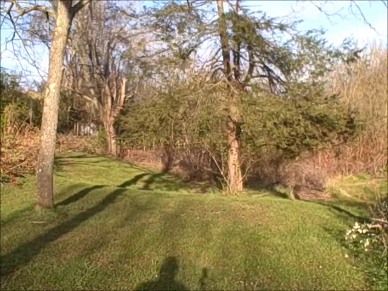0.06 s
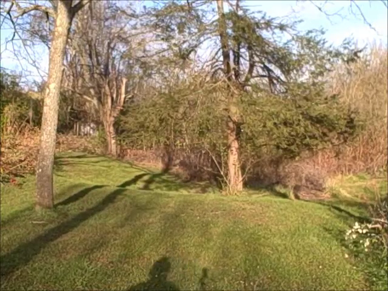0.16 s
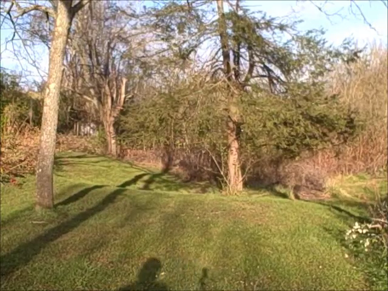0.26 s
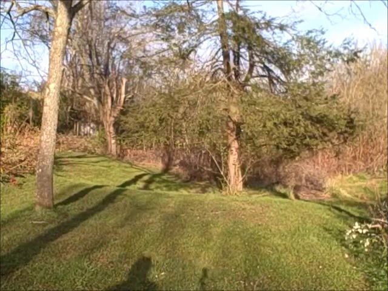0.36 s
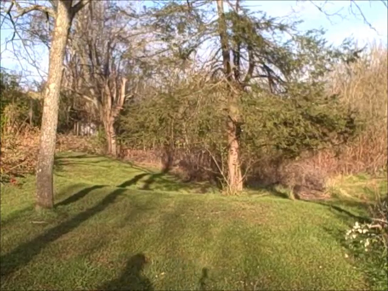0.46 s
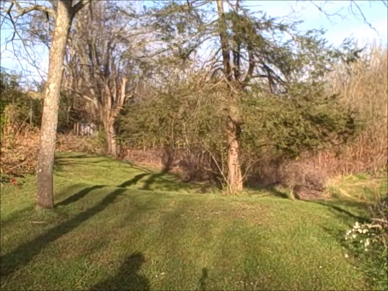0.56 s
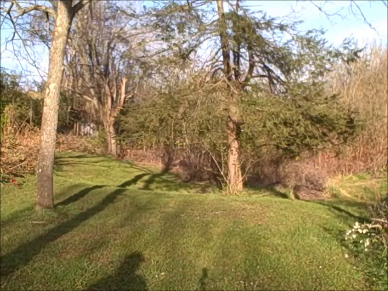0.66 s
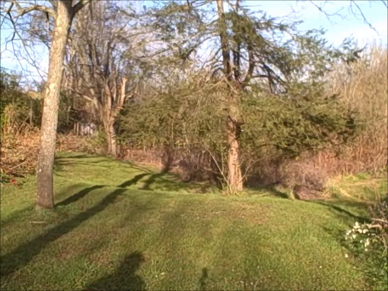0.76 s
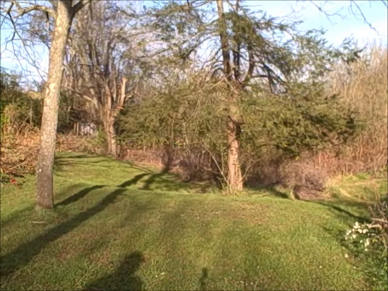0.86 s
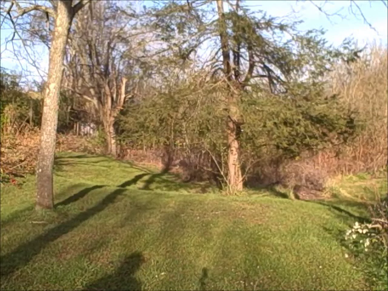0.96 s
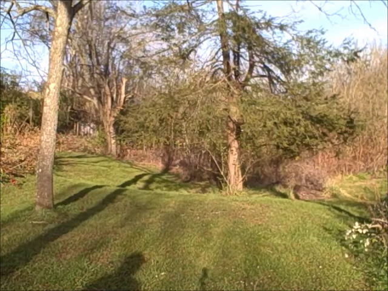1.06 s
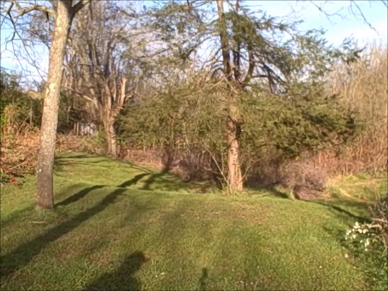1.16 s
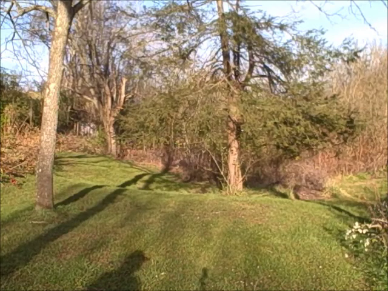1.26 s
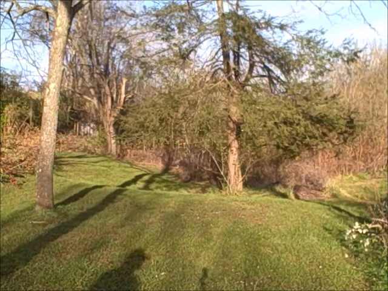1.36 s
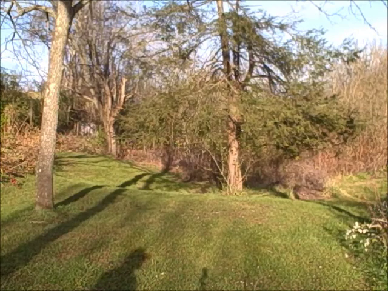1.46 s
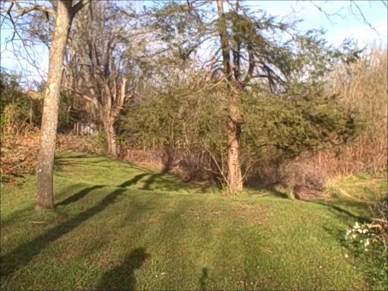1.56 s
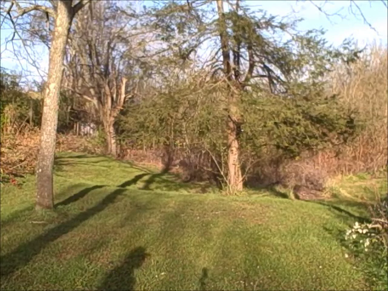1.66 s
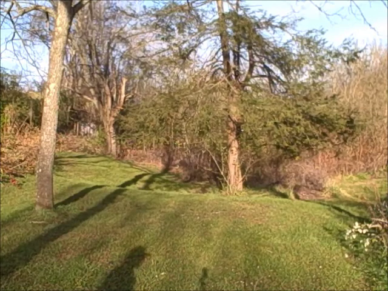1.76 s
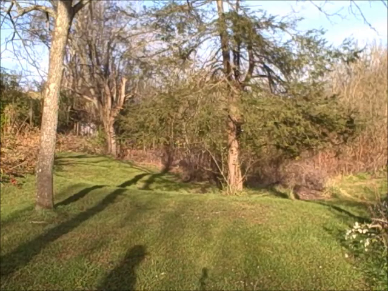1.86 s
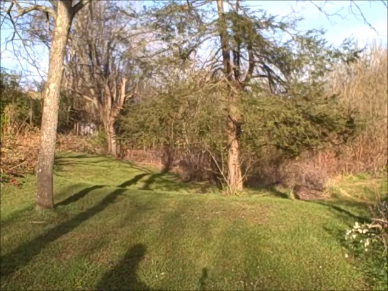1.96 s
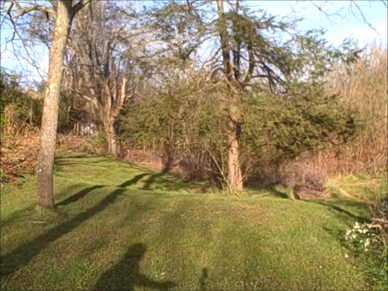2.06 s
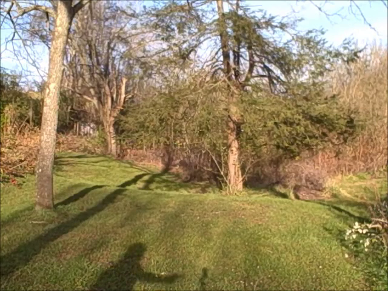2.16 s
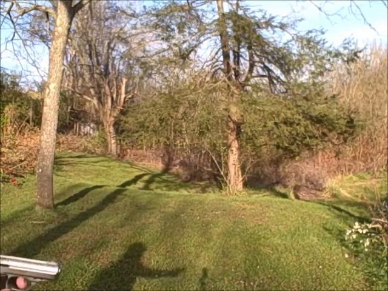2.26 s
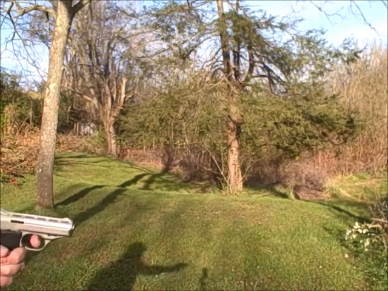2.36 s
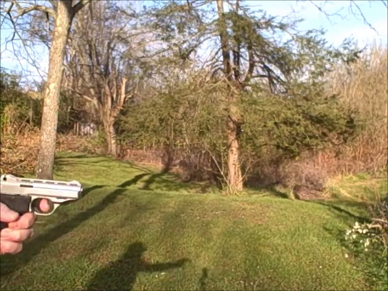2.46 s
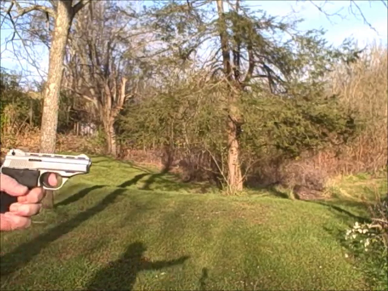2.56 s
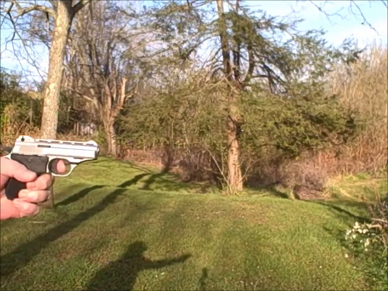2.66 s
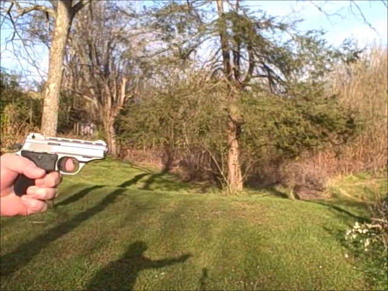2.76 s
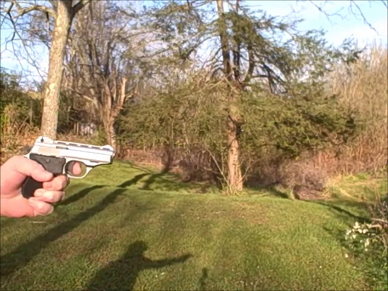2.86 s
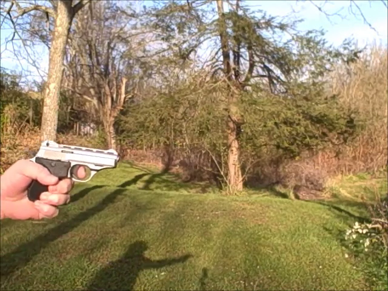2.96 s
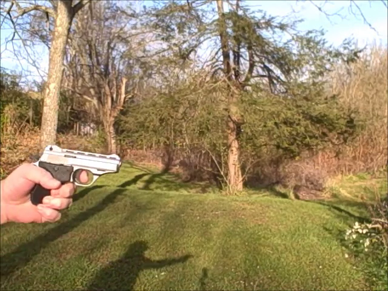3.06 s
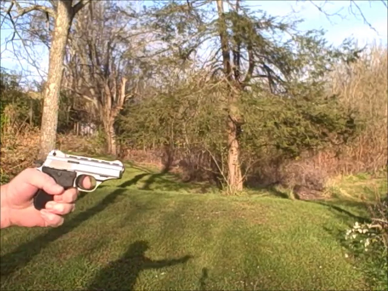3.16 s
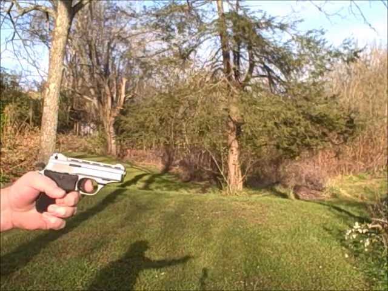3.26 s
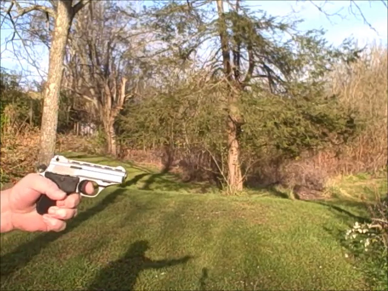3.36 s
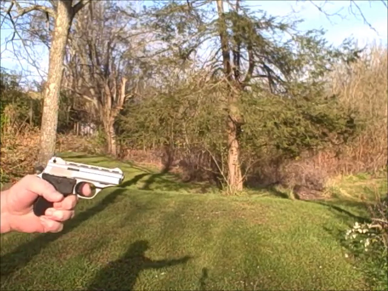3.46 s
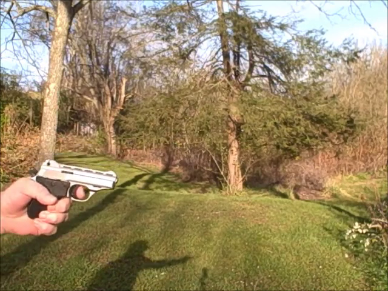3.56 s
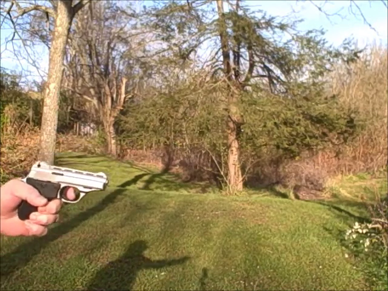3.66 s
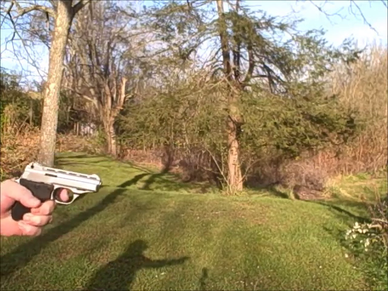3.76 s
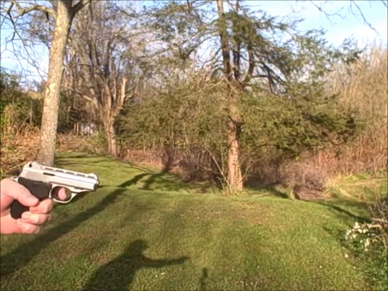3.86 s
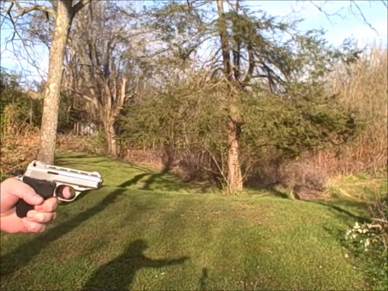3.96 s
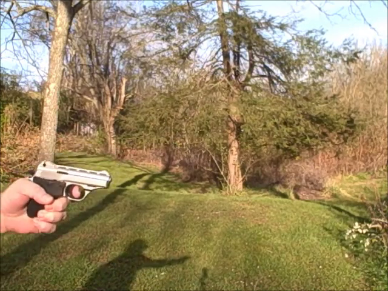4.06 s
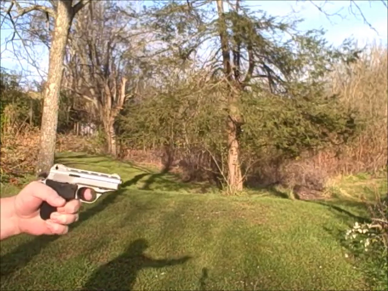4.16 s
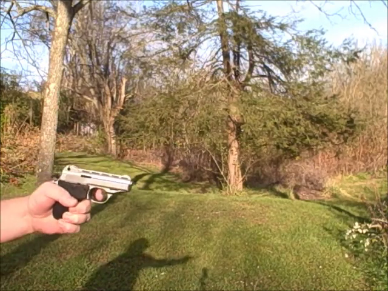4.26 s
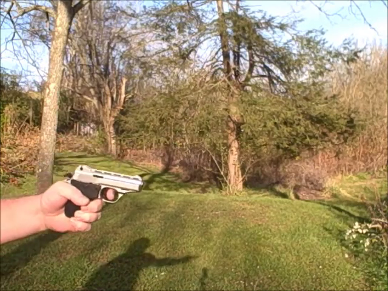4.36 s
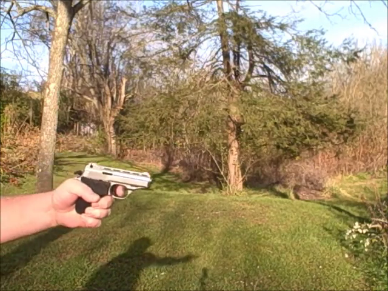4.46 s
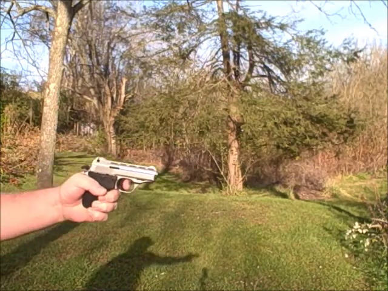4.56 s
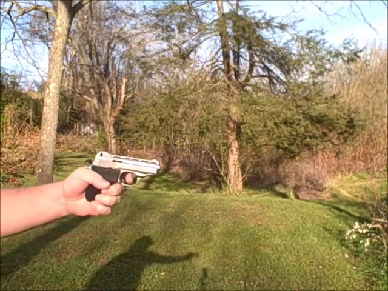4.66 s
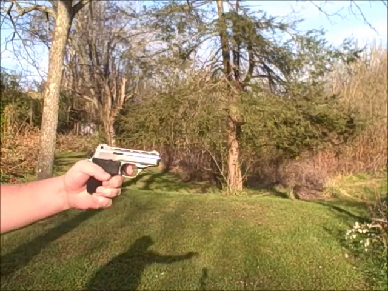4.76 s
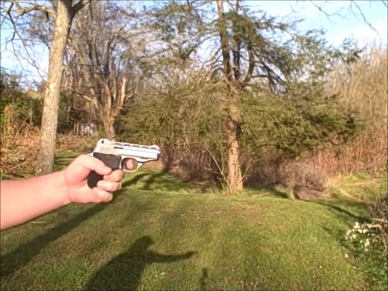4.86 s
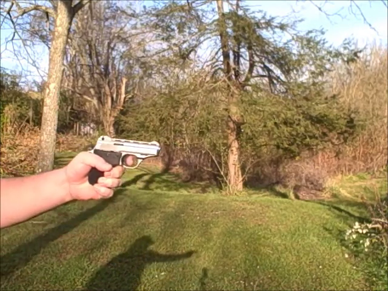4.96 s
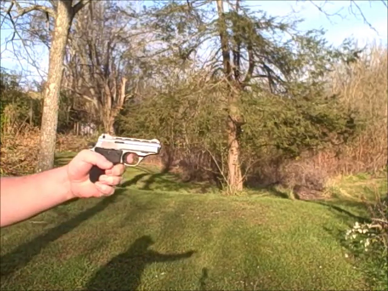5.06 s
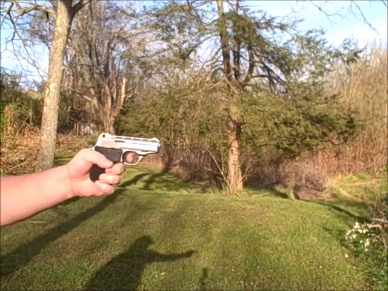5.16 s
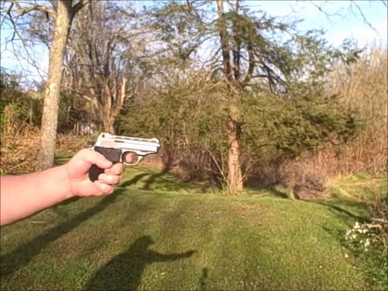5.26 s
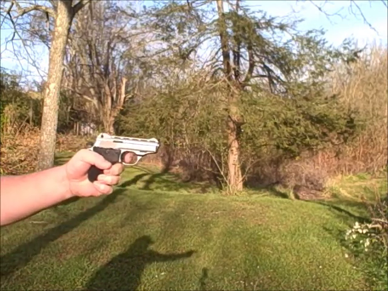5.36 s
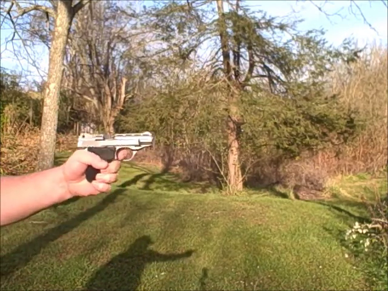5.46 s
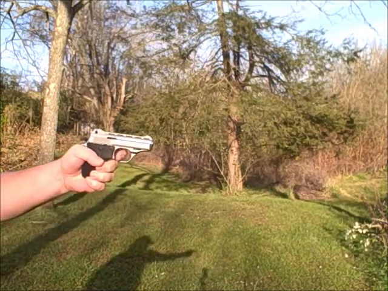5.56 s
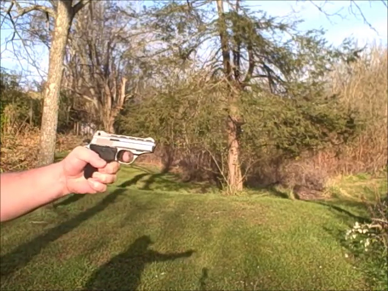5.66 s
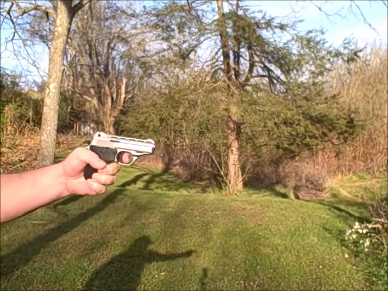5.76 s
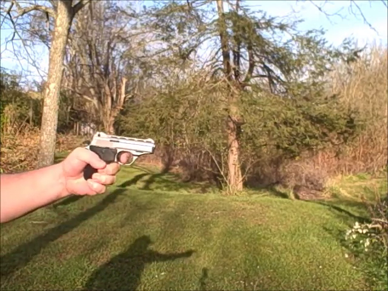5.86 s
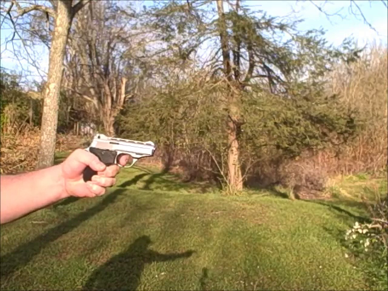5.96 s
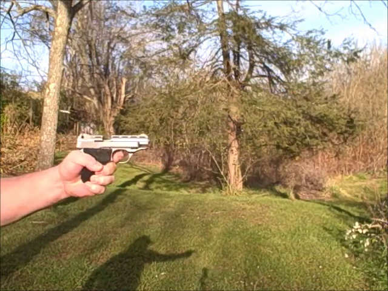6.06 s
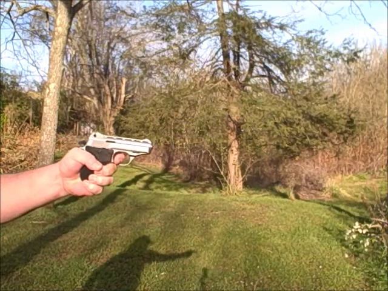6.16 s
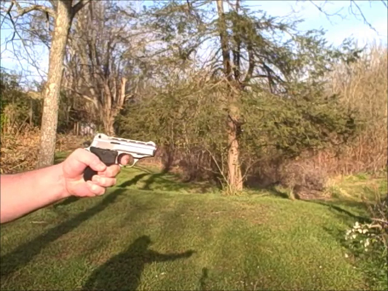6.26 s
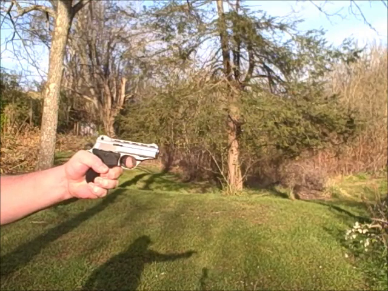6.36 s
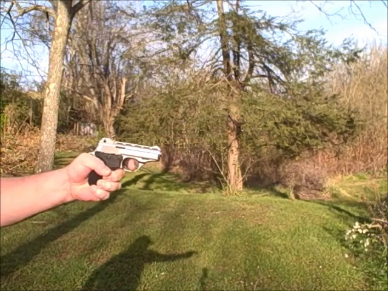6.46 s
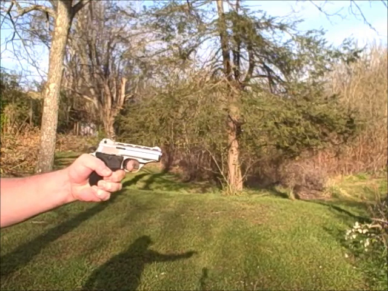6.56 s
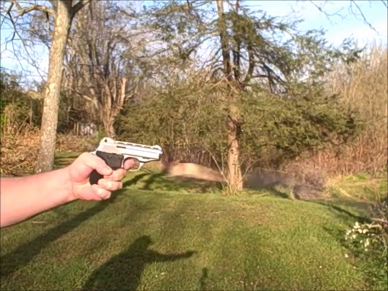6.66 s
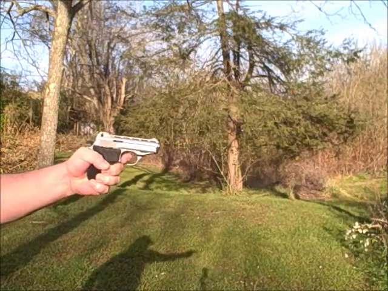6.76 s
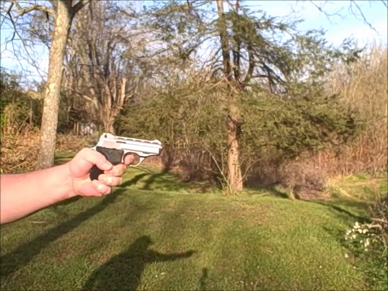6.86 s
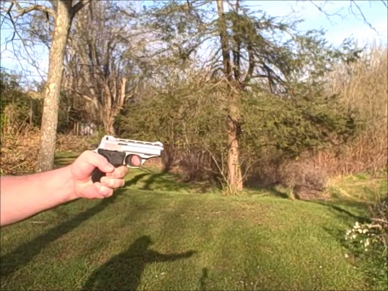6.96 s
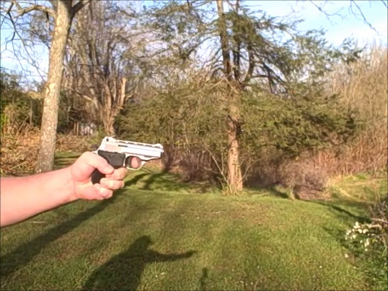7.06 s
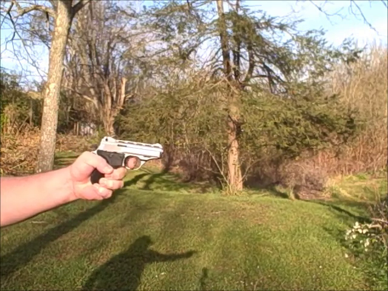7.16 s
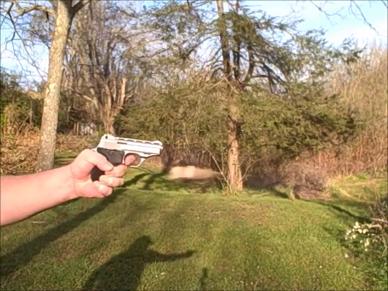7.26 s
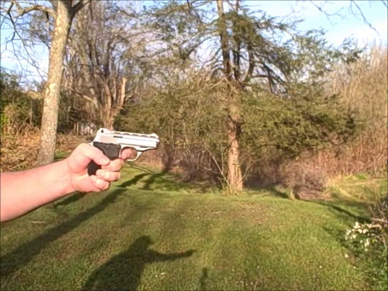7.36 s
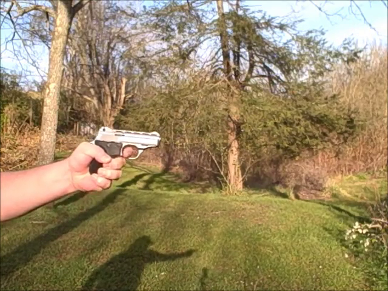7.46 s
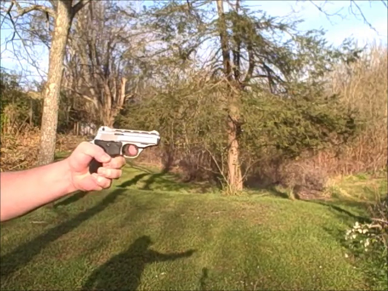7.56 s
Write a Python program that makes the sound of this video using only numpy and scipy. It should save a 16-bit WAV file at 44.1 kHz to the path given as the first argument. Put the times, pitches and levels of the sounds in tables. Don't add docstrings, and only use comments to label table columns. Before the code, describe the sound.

Sleeve rustling, clicks and faint wind outdoors, then a small handgun fires four evenly spaced, overloaded cracks, each trailing briefly into the trees.

```python
import sys
import numpy as np
from scipy import signal
from scipy.io import wavfile

SR = 44100
rng = np.random.default_rng(int(sys.argv[2]) if len(sys.argv) > 2 else 0)


def materialize(psi):
    bounded = np.clip(np.atleast_2d(psi).T, -1, 1)
    quanta = np.round(bounded * 32767).astype(np.int16)
    wavfile.write(sys.argv[1], SR, quanta)


def ratio_of_db(decibels):
    return 10 ** (np.asarray(decibels, float) / 20)


N = 335160

# t/s, recovery/ms, rebound height, rebound swing f/Hz, rebound decay/s
SHOTS = [
    (5.567, 7.7, 0.42, 3.1, 0.11),
    (6.1617, 5.4, 0.13, 0.72, 0.26),
    (6.7910, 4.8, 0.13, 0.68, 0.23),
    (7.3915, 4.8, 0.16, 0.64, 0.19),
]
SETTLED_DB = -15


def rms_one(x):
    return x / np.sqrt(np.mean(x ** 2) + 1e-20)


def in_time(rows, start=0):
    s, *columns = np.transpose(rows)
    return [np.interp(np.arange(N) / SR + start, s, c) for c in columns]


def at_hz(points, hz, column=1):
    table = np.array(points)
    return np.interp(np.log(hz), np.log(table[:, 0]), table[:, column])


def band(x, low_hz, high_hz):
    return signal.sosfilt(signal.butter(2, [low_hz, min(high_hz, .45 * SR)], "band", fs=SR, output="sos"), x)


def drift(rate_hz):
    r = np.exp(-2 * np.pi * rate_hz / SR)
    white = rng.standard_normal(N + SR)
    return rms_one(signal.lfilter([1], [1, -2 * r, r * r], white)[SR:])


def coloured(spectrum, fading, patchy_db, size=N):
    out, power, white = 0, 0, rng.standard_normal((2, size))
    octaves = np.log2(spectrum[-1][0] / spectrum[0][0])
    edges = spectrum[0][0] * 2 ** np.arange(0, octaves + .3, 1 / 3)
    flicker = drift(25.0)
    for k, (low, high) in enumerate(zip(edges, edges[1:])):
        hz = np.sqrt(low * high)
        part = ratio_of_db(at_hz(spectrum, hz)) * band(white[k % 2], low, high)
        power += np.mean(part ** 2)
        flicker_db = patchy_db * np.roll(flicker, 9973 * k)[:size]
        out = out + part * ratio_of_db(flicker_db - at_hz(fading, hz) * np.arange(size) / SR)
    return out / np.sqrt(power)


def add(out, s, piece):
    i = round(s * SR)
    out[i:i + len(piece)] += piece[:len(out) - i]


def ping(hz, t60):
    t = np.arange(int(t60 * SR)) / SR
    return np.sin(2 * np.pi * hz * t) * ratio_of_db(-60 * t / t60)


def burst(low_hz, high_hz, t60):
    t = np.arange(2000) / SR
    return rms_one(band(rng.standard_normal(2000), low_hz, high_hz)) * ratio_of_db(-60 * t / t60)


def swell(s, rise_s, fall_s, curve):
    shape = np.interp(np.arange(N) / SR, [s - rise_s, s, s + fall_s], [0, 1, 0])
    return np.power(shape, curve, out=np.zeros(N), where=shape > 0)


def background():
    # t/s, f/Hz, level/dB
    engine = [(0.0, 53.9, -50.5), (1.06, 58.1, -51.5), (1.25, 63.07, -59), (1.45, 56.2, -65),
              (1.93, 54, -51.5), (2.65, 51.36, -50), (4.79, 45.87, -46.5), (4.95, 55.7, -54),
              (5.1, 61.9, -51), (5.5, 80, -61)]
    # t/s, level/dB
    breeze = [(0, -66), (1.7, -67.5), (2.3, -52), (3.0, -78), (3.7, -59), (4.12, -49.5), (4.5, -53),
              (4.84, -58), (5.42, -51), (5.54, -48)]
    # t/s, level/dB, width/s
    gust_rows = [(.26, -53, .08), (.6, -53.5, 0.3), (1.28, -43, 0.15), (1.48, -46, 0.084),
                 (1.96, -45, 0.18), (2.48, -41, .1), (4.58, -35.5, .09)]
    # f/Hz, level/dB per Hz
    air_colour = [(24, -23), (45, -11), (70, -14), (131, -22), (900, -28.5), (2000, -32.5), (3050, -40),
                  (16500, -50)]
    air_db = -51.5
    hz, engine_db = in_time(engine)
    engine_level = np.sqrt(2) * ratio_of_db(engine_db + 1.3 * drift(6.3))
    unsteady_hz = hz * (1 + 0.0096 * drift(6))
    drone = engine_level * np.sin(2 * np.pi * np.cumsum(unsteady_hz) / SR)
    gusts = sum(ratio_of_db(db) * swell(s, width, 1.26 * width, 1.5) for s, db, width in gust_rows)
    wind_level = ratio_of_db(in_time(breeze)[0] + 3.0 * drift(5)) + gusts
    wind = wind_level * rms_one(band(rng.standard_normal(N), 10, 30))
    air = ratio_of_db(air_db) * coloured(air_colour, [(1000, 0.0042), (2000, 0.0072)], patchy_db=2.1)
    return drone + wind + air


def rustle():
    # peak t/s, rise/s, fall/s, fabric hiss level/dB, dull rubbing level/dB
    moves = [(.28, 0.062, 0.019, -41, -45), (.3, 0.035, 0.88, -51.5, -54.5),
             (.55, 0.03, 0.12, -39.5, -42.5), (.7, 0.16, .2, -54, -58), (1.13, 0.47, 0.09, -47.5, -48.5),
             (1.23, 0.083, 0.68, -49.5, -52), (1.48, .08, 0.26, -56, -78), (1.76, 0.075, 0.18, -43, -51),
             (1.87, 0.12, .06, -74, -50.5), (2.17, 0.38, 0.13, -49.5, -43.5), (2.31, 0.061, 0.12, -52, -55),
             (2.42, 0.35, 0.2, -45, -46.5), (2.71, 0.14, 0.42, -61, -75), (3.44, 0.096, 0.57, -43, -51),
             (3.63, .1, 0.34, -44, -54.5), (3.93, 0.19, 0.48, -52, -54), (4.099, 0.029, 0.11, -36, -50),
             (4.24, 0.098, 0.099, -46, -59), (4.33, 0.16, 0.13, -54, -57), (4.4, .03, .04, -53, -61),
             (4.62, 0.5, 0.6, -55.5, -57), (4.81, 0.089, 0.077, -35.5, -42.5), (5.0, 0.19, .3, -65, -60),
             (5.18, .02, 0.071, -74, -64)]
    # f/Hz, level/dB per Hz
    fabric = [(2940, -43), (5000, -22), (8000, -9.5), (9960, -8.5), (13200, 0), (15700, -6), (16200, -12),
              (16500, -28.5)]
    swells = np.array([swell(s, rise, fall, 1.91) for s, rise, fall, *levels in moves])
    hiss_db, dull_db = np.transpose(moves)[-2:]
    scratch_db = -3 + 0.51 * hiss_db + 0.49 * dull_db
    before_shots = np.arange(N) < SHOTS[0][0] * SR

    grain_here = rng.random(N) < 450 * ratio_of_db(5 * drift(25)) / SR
    grain_height = ratio_of_db(6.4 * np.minimum(rng.exponential(1, N), 3.5))
    grains = rms_one(grain_here * grain_height * rng.choice([-1, 1], N))
    smooth = coloured(fabric, [(1000, 0), (2000, 0.012)], patchy_db=2.0) * ratio_of_db(1.5 * drift(40))
    hiss = smooth + 0.68 * rms_one(band(grains, 8200, 16000))
    slide = rng.standard_normal(N) + 0.74 * grains
    dull = rms_one(band(slide, 310, 1160)) * ratio_of_db(2.7 * drift(30))
    scratch = rms_one(band(slide, 2500, 6400))

    hiss_level = ratio_of_db(-78) + ratio_of_db(hiss_db) @ swells
    dull_level = ratio_of_db(-77) + ratio_of_db(dull_db) @ swells
    return before_shots * (hiss_level * hiss + dull_level * dull + ratio_of_db(scratch_db) @ swells * scratch)


def ticks_and_knocks():
    # t/s, peak level/dB
    seam_ticks = [(0.177, -35), (.3216, -27), (0.4177, -19), (0.4663, -23), (.633, -32), (.7013, -36),
                  (.7282, -35), (0.769, -23.5), (1.0705, -29), (1.1907, -34), (1.327, -27), (1.3586, -27),
                  (1.3897, -35), (1.507, -19.5), (1.5292, -21.5), (1.592, -27), (1.7484, -24.5),
                  (1.9202, -31), (3.813, -25), (3.8469, -26), (3.916, -38), (3.9719, -27), (4.1944, -27),
                  (4.221, -20), (4.2382, -18), (4.3897, -30), (4.3994, -31), (4.854, -22), (4.8973, -30),
                  (5.186, -29)]
    # t/s, peak level/dB, f/Hz
    grip_ticks = [(.2337, -37, 7310), (.2676, -30, 11000), (.3701, -31, 14300), (.5336, -33, 13010),
                  (1.1205, -30, 13800), (1.162, -22, 10300), (1.2395, -27, 13100), (1.4321, -36, 14400),
                  (1.4568, -29, 13200), (1.4815, -29.5, 8500), (2.1138, -24.5, 13500),
                  (2.2194, -33.5, 13870), (2.3207, -26.5, 13470), (3.733, -25, 12900),
                  (4.0903, -22.5, 11100), (4.338, -41, 12960), (4.499, -35, 11730), (4.7875, -26, 12970),
                  (4.98, -41, 13300), (5.1127, -35.5, 13200), (5.5643, -3, 9940)]
    # t/s, peak level/dB
    late_ticks = [(6.4894, -56), (6.5394, -58), (6.5744, -51), (6.6774, -57), (7.2694, -58)]
    # t/s, peak level/dB, f/Hz
    knocks = [(0.269, -36, 1130), (0.318, -31, 520), (0.59, -42, 360), (1.056, -31, 620),
              (1.124, -29.5, 680), (1.161, -43, 926), (1.2403, -41, 900), (1.456, -33.5, 820),
              (1.69, -42, 487), (1.817, -35, 770), (1.873, -26, 595), (2.121, -33, 869),
              (2.209, -36.5, 530), (2.351, -31, 640), (3.713, -36.5, 583), (3.734, -40, 586),
              (3.915, -37, 622), (4.128, -36.5, 525), (4.369, -37, 900), (4.655, -35, 785),
              (4.706, -37.5, 555), (5.035, -38.5, 584), (5.112, -36.5, 564), (5.567, 2, 480)]
    # peak t/s, rise/s, fall/s, f/Hz, level/dB
    slides = [(1.3, .1, .12, 4650, -62), (2.75, 0.22, .25, 5000, -66), (2.75, 0.22, .25, 6450, -70),
              (3.51, 0.017, 0.017, 2050, -58)]
    # t/s, f/Hz, level/dB, ring/s
    hollow = [(0.56, 195, -44, 0.22), (0.49, 376, -47, 0.1)]
    out = np.zeros(N)
    all_ticks = [(s, db, 13100, -23.5) for s, db in seam_ticks]
    all_ticks += [(*row, -12.5) for row in grip_ticks]
    for s, db, hz, body_db in all_ticks:
        bright = ratio_of_db(db - 2.5) * burst(0.55 * hz, 1.42 * hz, 0.0039)
        body = ratio_of_db(db + body_db + 5) * burst(800, 5500, 0.0055)
        add(out, s, bright + body)
    for s, db in late_ticks:
        add(out, s, ratio_of_db(db - SETTLED_DB - 5.0) * burst(9000, 15550, .012))
    for s, db, hz in knocks:
        add(out, s, ratio_of_db(db + 3.0) * ping(hz, 10.7 / hz))
        add(out, s, ratio_of_db(db - 6.5) * burst(700, 3600, 0.0053))
    for s, rise, fall, hz, db in slides:
        creak = rms_one(band(rng.standard_normal(N), 0.9 * hz, 1.04 * hz))
        out += ratio_of_db(db) * swell(s, rise, fall, 0.53) * creak
    for s, hz, db, ring_s in hollow:
        add(out, s, ratio_of_db(db) * ping(hz, ring_s * 3))
    return out


def near_reflections(size):
    # t/ms after the shot, width/ms, peak level/dB
    humps = [(3.308, 0.55, 20.5), (5.03, 0.45, 20.5), (7.053, 1.1, 21.5), (9.79, 0.16, 7.5),
             (10.85, 0.45, 2), (12.04, 0.21, -1.5), (25.72, 0.58, -0.5), (27.24, 0.41, 2.8),
             (28.25, 0.22, 6.5), (28.55, 0.31, 10), (30.64, 0.57, -2.5), (34.3, .46, -8.5),
             (34.77, 0.57, -2), (36, .55, 2.5), (37.9, .5, -6), (39.36, 0.5, -5), (43.5, 0.35, -2),
             (45.8, 0.55, -4.5)]
    out = np.zeros(size)
    after_ms = np.cumsum(.8 * 1.07 ** np.arange(10))
    luck = rng.normal(size=(10, 3))
    lesser = [(12.0 + ms + .2 * a, 0.53 * (1 + 0.13 * b), -3 - 0.4 * ms + 6.6 * c)
              for ms, (a, b, c) in zip(after_ms, luck)]
    for ms, width, db in humps + lesser:
        hump = np.hanning(int(1.5 * width * SR / 1000))
        add(out, (ms - .75 * width) / 1000, ratio_of_db(db) * hump)
    return signal.sosfilt(signal.butter(1, 90, "high", fs=SR, output="sos"), out)


def surroundings():
    pattern_s = 6.791
    # t/s, peak level/dB, f/Hz, ring/s
    far_echoes = [(6.844, -8, 1247, 0.0062), (6.863, -7.5, 898, 0.016), (6.872, -16.5, 718, 0.017),
                  (6.8885, -9.5, 510, 0.014), (6.896, -19, 635, 0.015), (6.949, -20, 407, 0.022),
                  (6.958, -18, 650, 0.015), (6.963, -16, 433, 0.028), (6.973, -12.5, 990, 0.0082),
                  (7.013, -21.5, 670, 0.019), (7.02, -18, 1535, 0.017), (7.029, -19.5, 680, 0.023),
                  (7.171, -33, 68, 0.083), (7.169, -19, 870, 0.017), (7.181, -32, 608, 0.015),
                  (7.197, -28.5, 860, 0.019), (7.216, -27, 790, 0.022)]
    # t/s, level/dB
    tree_lines = [(6.82, -20), (6.87, -23), (6.925, -30.5), (6.96, -23), (6.995, -29.5), (7.025, -24.5),
                  (7.07, -29.5), (7.2, -34.5), (7.38, -36.5)]
    # f/Hz, level/dB per Hz
    tree_colour = [(60, -20.5), (184, -17), (330, -4.5), (760, 1), (2500, -5.5), (3300, -19), (7000, -47.5),
                   (15400, -120)]
    # f/Hz, loss/dB per s
    tree_loss = [(90, -11.5), (200, -4.5), (1000, 1), (2500, 24.5), (6000, 30.5)]
    # f/Hz, first level/dB, spreading/dB per doubling of time, air loss/dB per s
    leaf_scatter = [(1520, -3.5, 11, 3), (3180, -15.5, 8, 13.5), (5000, -16.5, 7, 30.5),
                    (7930, -12.5, 8.5, 50.5), (15100, -8, 9.5, 72.5)]
    size = 3 * SR // 2
    t = np.arange(size) / SR
    out = near_reflections(size)
    for s, db, hz, ring_s in far_echoes:
        add(out, s - pattern_s, ratio_of_db(db + 2) * ping(hz, max(ring_s, .003)))
        add(out, s - pattern_s, ratio_of_db(db - 10.0) * burst(0.97 * hz, 2550, 0.0092))
    late_s = np.maximum(t - (tree_lines[-1][0] - pattern_s), 0)
    level_db = in_time(tree_lines, start=pattern_s)[0][:size] - 14 * late_s
    onset = np.clip(t / 0.012, 0, 1)
    out += ratio_of_db(level_db) * onset * coloured(tree_colour, tree_loss, patchy_db=2.5, size=size)
    for low in 1500 * 2 ** np.arange(0, 3.5, .5):
        first, spreading, loss = (at_hz(leaf_scatter, 1.19 * low, column=c) for c in (1, 2, 3))
        fade_db = first - spreading * np.log2(1 + t / 0.014) - loss * t
        out += ratio_of_db(fade_db) * rms_one(band(rng.standard_normal(size), low, low * np.sqrt(2)))
    return out * ratio_of_db(-SETTLED_DB)


def shots():
    out, returns = np.zeros(N), surroundings()
    for s, *overload in SHOTS:
        add(out, s - .0040, ratio_of_db(1.5) * burst(3770, 17000, 0.003))
        crack_rise = np.clip(np.arange(2000) / 30, .05, 1)
        add(out, s - .0007, ratio_of_db(20.0) * burst(910, 14000, 0.0087) * crack_rise)
        add(out, s, returns)
    return out


def capsule_offset():
    out, t = np.zeros(N), np.arange(SR) / SR
    for s, recovery_ms, rebound, swing_hz, decay_s in SHOTS:
        push = -5.5 * np.clip(t / 0.0018, 0, 1) ** 2 * np.exp(-1000 * t / recovery_ms)
        swing = rebound * (1 - np.exp(-t / .012)) * np.exp(-t / decay_s) * np.cos(2 * np.pi * swing_hz * t)
        add(out, s, push + swing)
    return out


def recorder_gain():
    # delay t/s, ducking time/s, recovery/dB per s
    ducks = [
        (.06, .09, 0.1),
        (-0.0037, 0.038, 12),
        (0.0022, 0.038, 9.5),
        (-0.00057, 0.039, 17),
    ]
    open_db, duck_db = -4, 7.5
    t, db = np.arange(N) / SR, open_db
    starts = [shot[0] + duck[0] for shot, duck in zip(SHOTS, ducks)]
    for s, until, (delay, duck_s, recovery_db) in zip(starts, starts[1:] + [N / SR], ducks):
        recovering_s = np.clip(t - s - duck_s, 0, until - s - duck_s)
        db = db - duck_db * np.clip((t - s) / duck_s, 0, 1) + recovery_db * recovering_s
    return ratio_of_db(db)


def scene():
    offset = capsule_offset() / recorder_gain()
    return (background() + rustle() + ticks_and_knocks() + shots() + offset)[None]


def top_cut(x):
    return signal.sosfilt(signal.butter(12, 16790, fs=SR, output="sos"), x)


def record(dry):
    clipped = np.clip(dry * recorder_gain(), -.98, .98)
    cut = signal.sosfilt(signal.cheby2(10, 40, 16100, fs=SR, output="sos"), clipped)
    return top_cut(np.clip(cut, -1, 1))


dry = scene()
out = record(dry)
materialize(out)
```